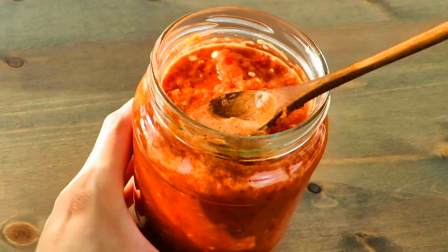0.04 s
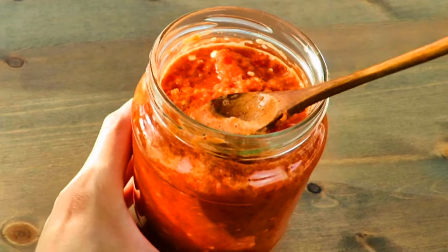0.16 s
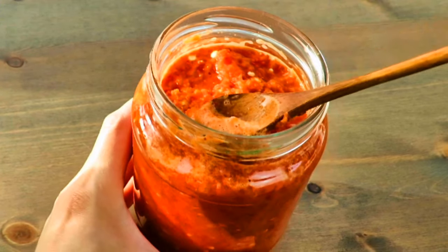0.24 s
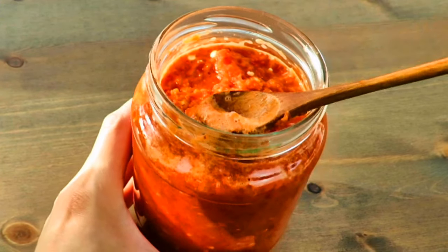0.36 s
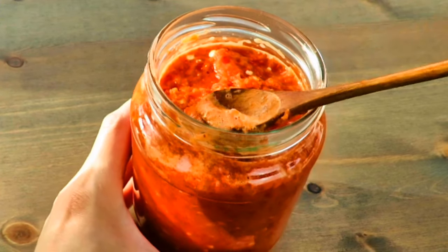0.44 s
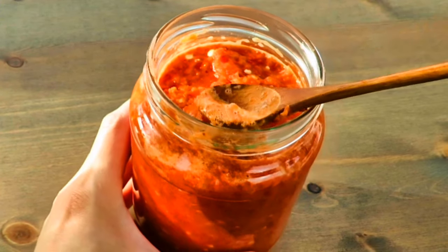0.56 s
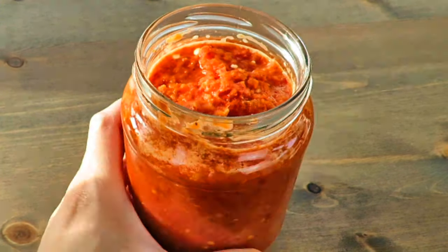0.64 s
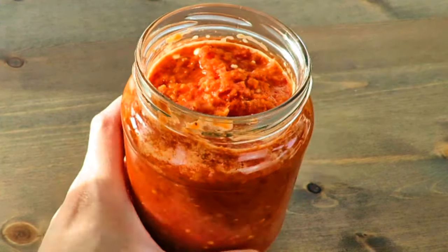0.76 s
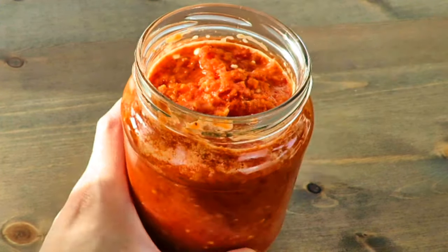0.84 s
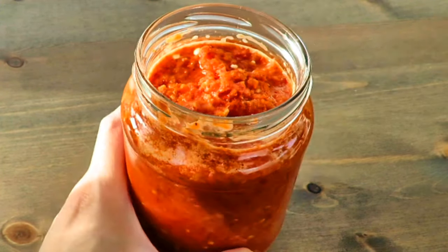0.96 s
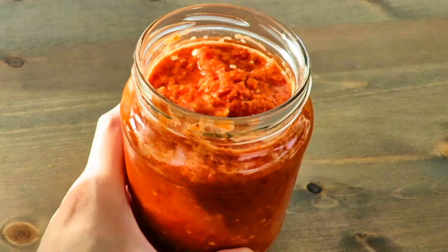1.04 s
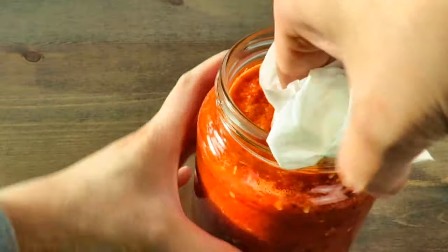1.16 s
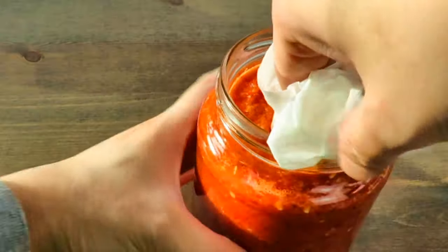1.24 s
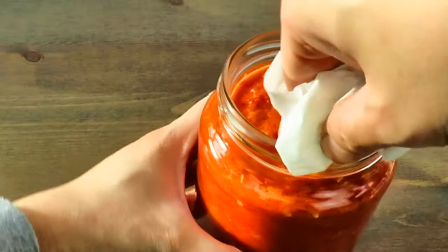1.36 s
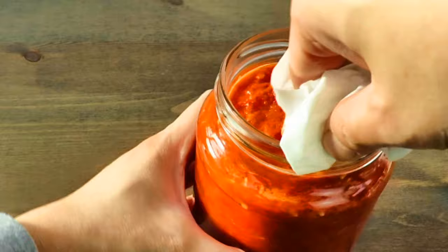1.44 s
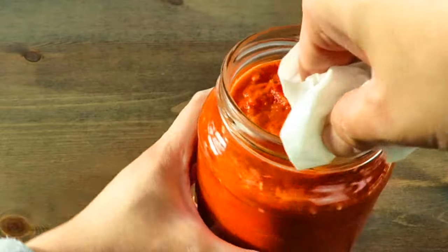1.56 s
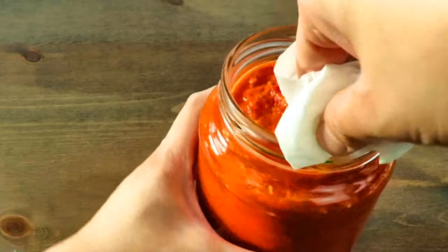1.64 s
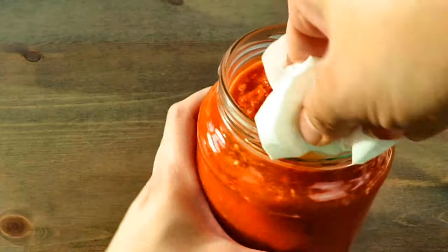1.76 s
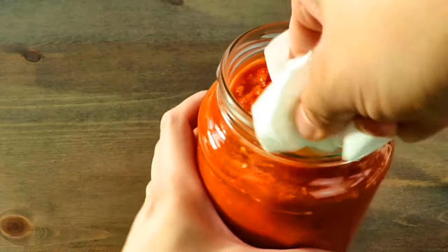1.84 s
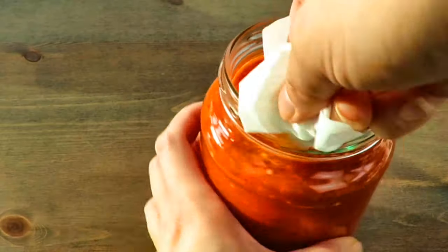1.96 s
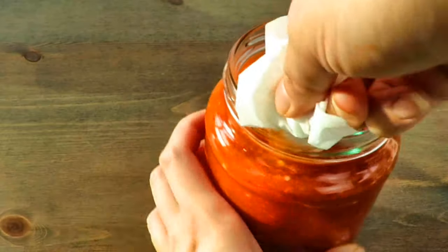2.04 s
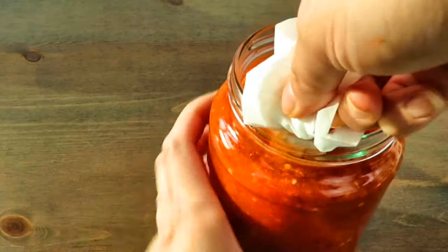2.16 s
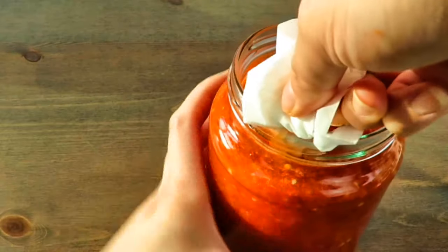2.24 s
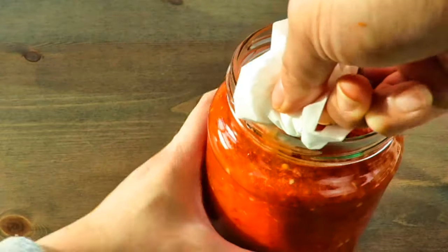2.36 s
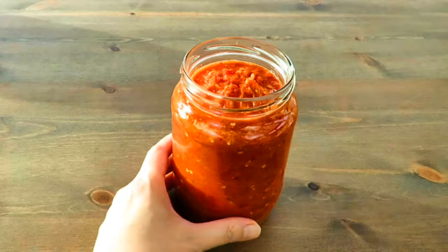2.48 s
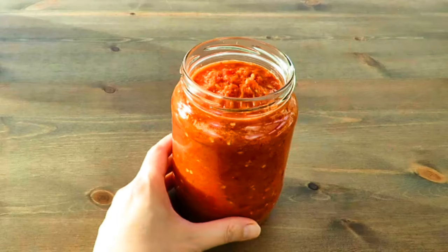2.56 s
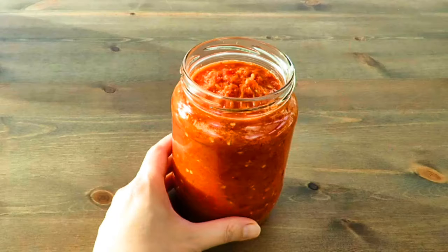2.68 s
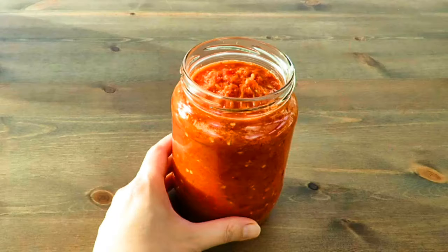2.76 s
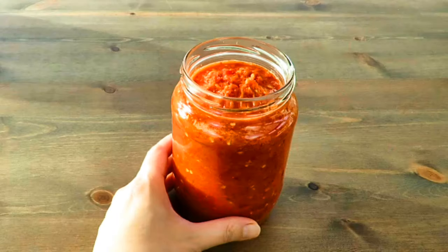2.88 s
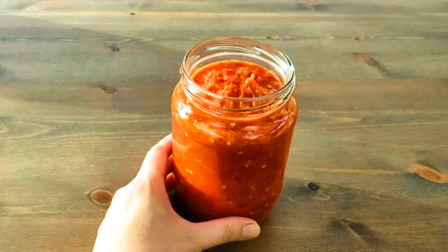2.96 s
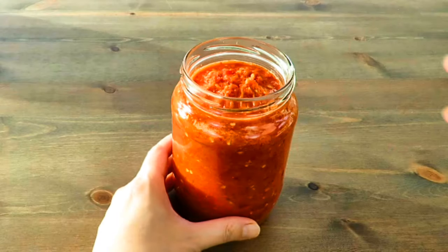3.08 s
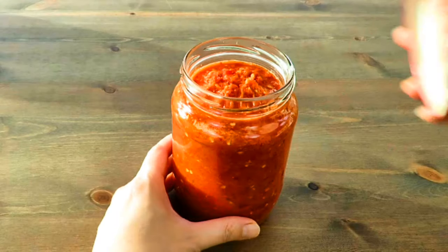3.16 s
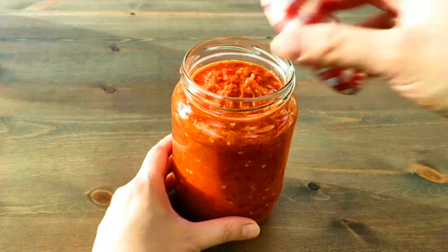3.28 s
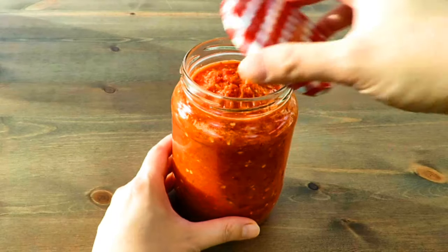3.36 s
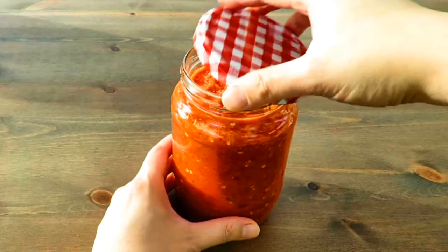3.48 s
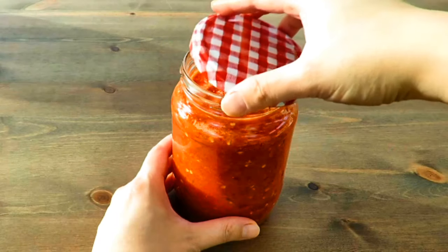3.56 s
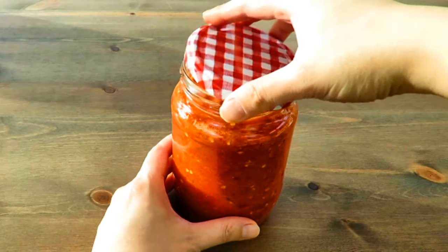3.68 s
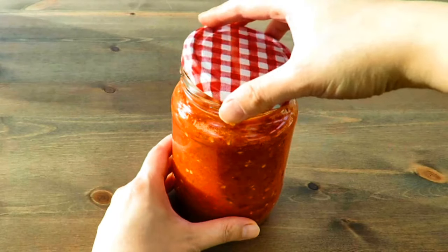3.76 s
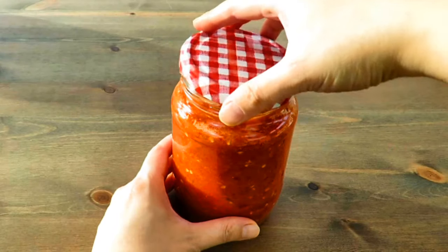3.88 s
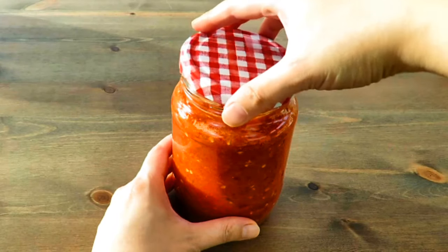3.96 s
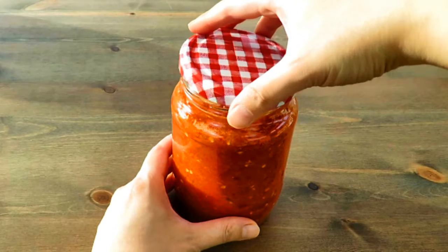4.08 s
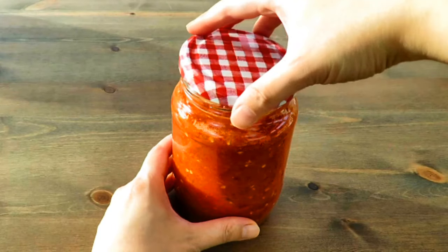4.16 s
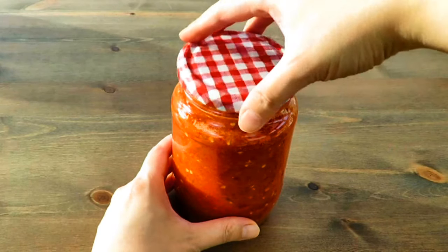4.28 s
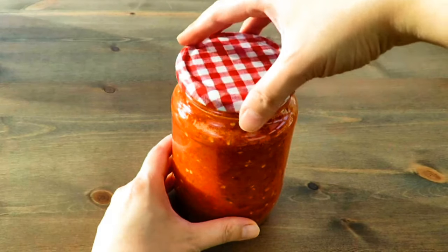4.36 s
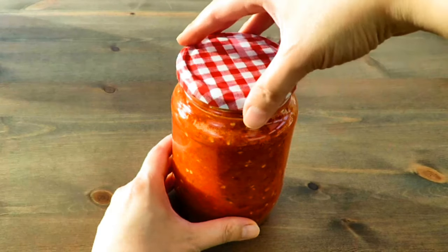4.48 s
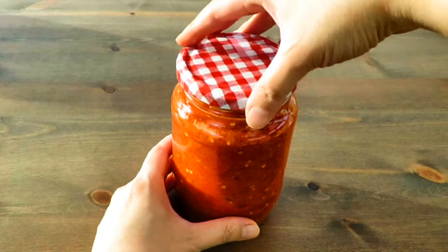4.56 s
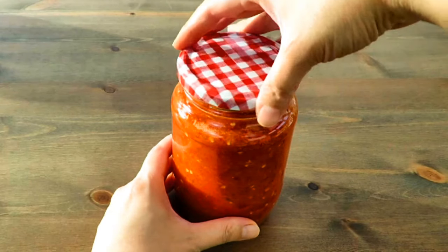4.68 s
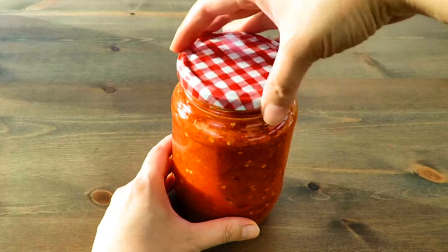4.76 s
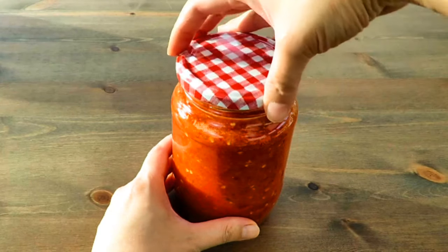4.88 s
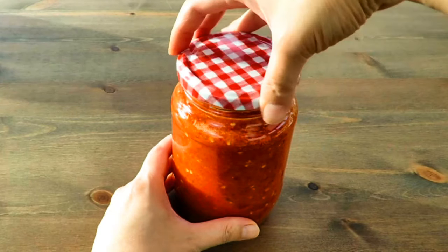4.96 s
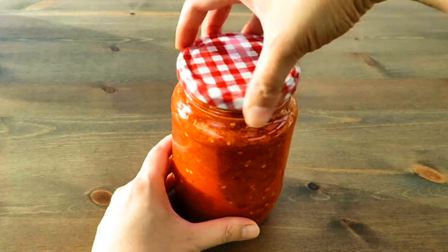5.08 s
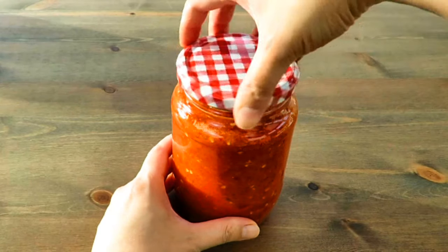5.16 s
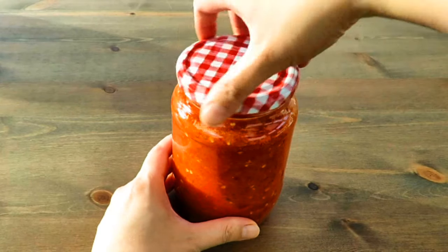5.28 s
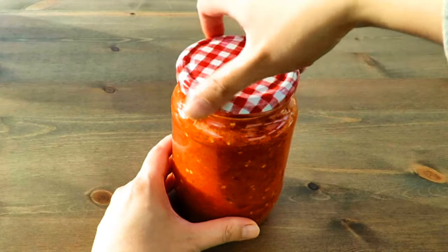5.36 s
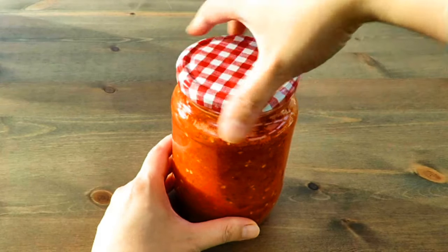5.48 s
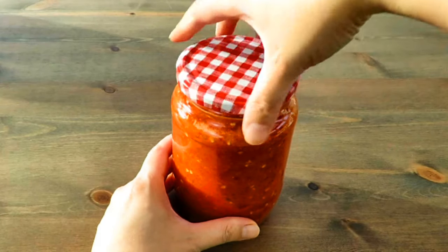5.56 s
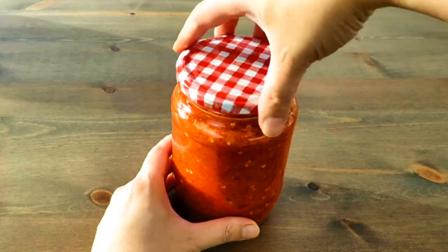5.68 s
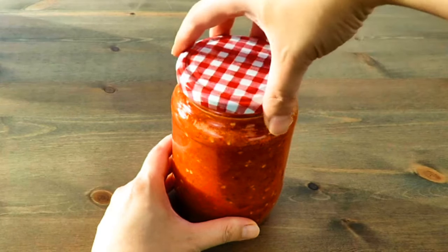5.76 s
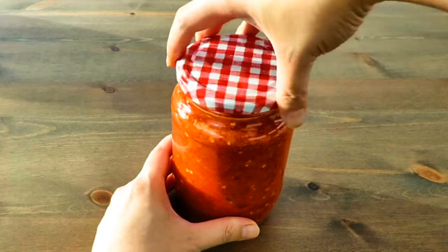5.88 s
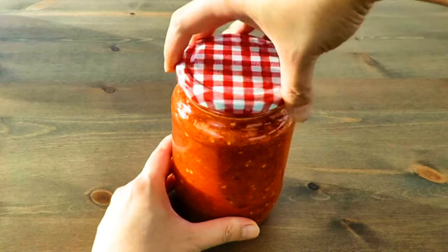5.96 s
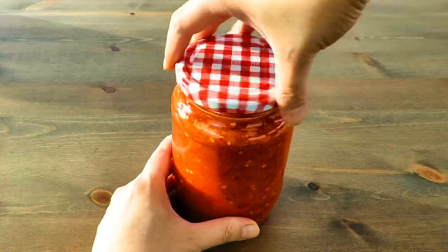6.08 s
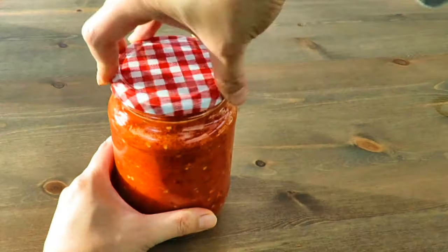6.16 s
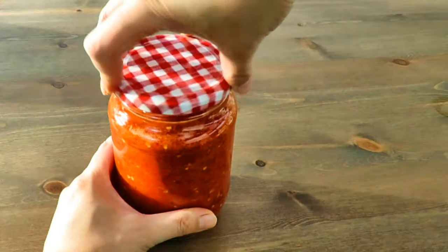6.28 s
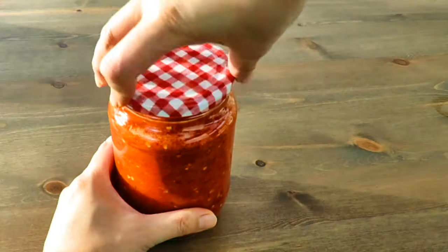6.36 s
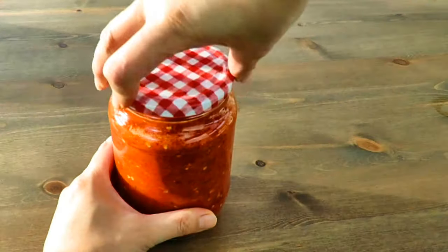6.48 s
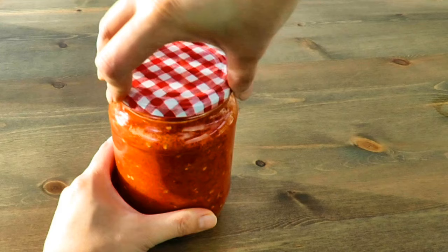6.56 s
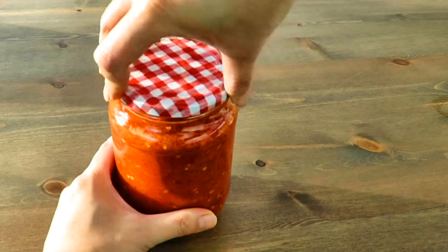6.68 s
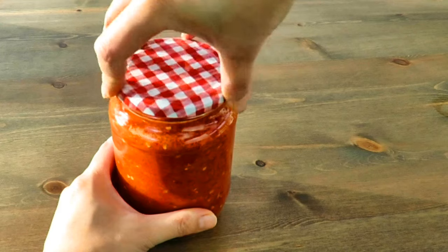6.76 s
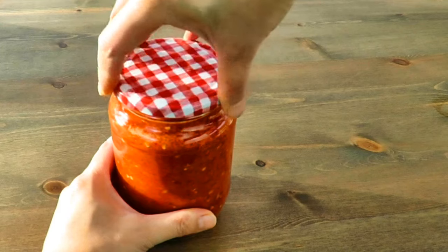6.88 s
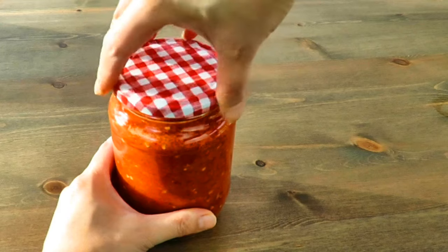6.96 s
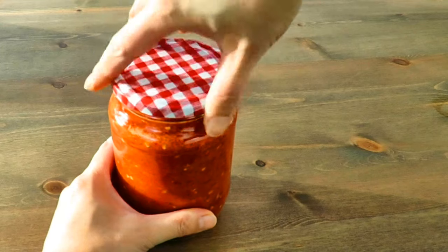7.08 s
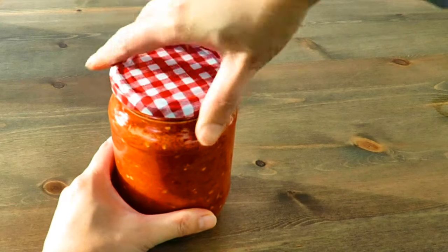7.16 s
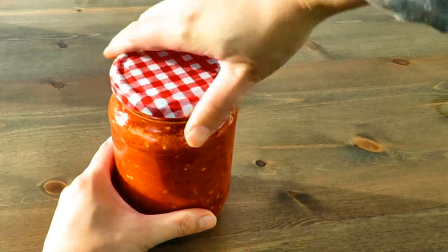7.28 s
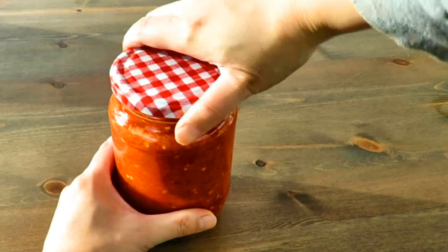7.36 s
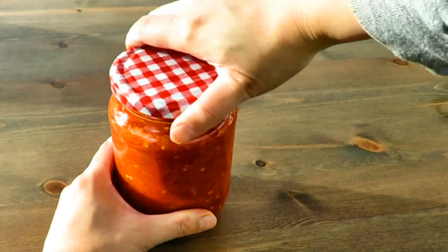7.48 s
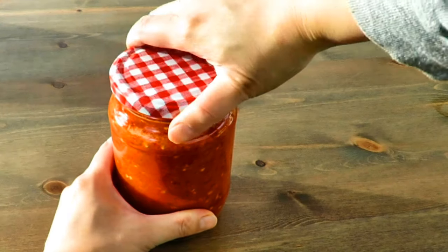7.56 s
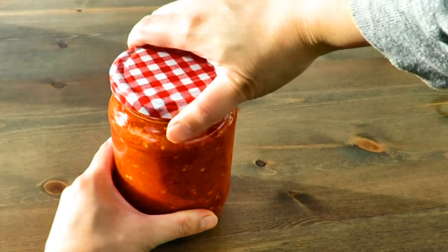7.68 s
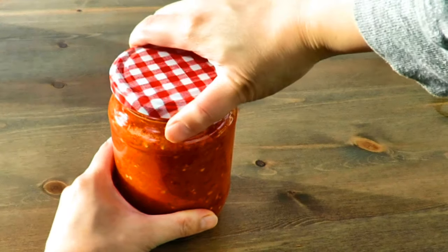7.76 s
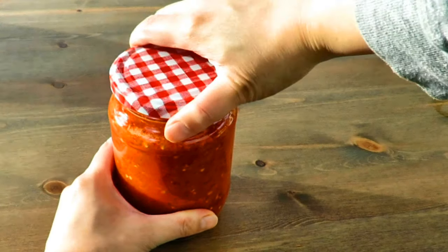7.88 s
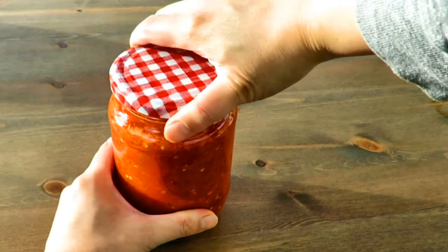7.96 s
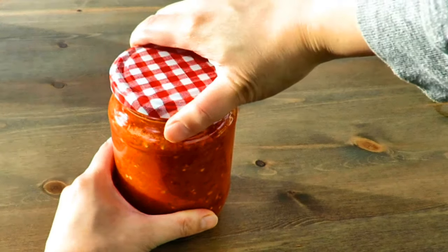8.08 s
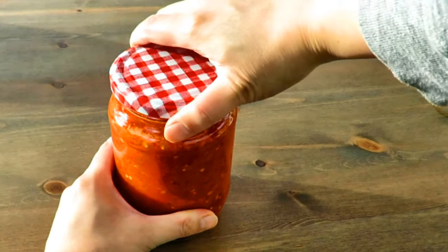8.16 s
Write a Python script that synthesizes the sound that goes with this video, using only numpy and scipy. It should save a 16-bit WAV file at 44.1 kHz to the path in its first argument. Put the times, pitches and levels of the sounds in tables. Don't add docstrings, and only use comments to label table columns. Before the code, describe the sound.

In a quiet home kitchen, a close stereo pair hears tiny wet ticks, then one wooden spoon knock on a full glass jar. Paper softly rubs the rim while the jar rocks and drags grittily over wood. After a pause, a thin metal lid clatters on, scrapes round in uneven catches and snaps hard. Low hand thumps follow through the table.

```python
import sys
import numpy as np
from scipy import signal
from scipy.fft import rfft, irfft
from scipy.io import wavfile
from scipy.ndimage import uniform_filter1d

SR = 44100
rng = np.random.default_rng(int(sys.argv[2]) if len(sys.argv) > 2 else 0)


def transcribe(u):
    v = np.clip(np.atleast_2d(u).T, -1, 1)
    q = np.round(v * 32767).astype(np.int16)
    wavfile.write(sys.argv[1], SR, q)


def gain_from_db(level_db):
    decades = np.asarray(level_db, float) / 20
    return 10 ** decades


N = 362369
BLOCK = 16384
STRIKE_LEN = 3000


def evened(x):
    return x / np.sqrt(np.mean(x ** 2) + 1e-20)


def read(points, hz):
    f, value = np.transpose(points)
    return np.interp(np.log(hz + 1), np.log(f + 1), value)


def add(mix, s, sound):
    part = mix[max(round(s * SR), 0):][:len(sound)]
    part += sound[:len(part)]


def played(rows):
    s, *columns = np.transpose(rows)
    t = np.arange(s[0], s[-1], 1 / SR)
    return s[0], [np.interp(t, s, c) for c in columns]


def chance(draw, size):
    return draw(size=-(-size // BLOCK) * BLOCK)


def coloured(points, size):
    white = chance(rng.standard_normal, size)
    gain = gain_from_db(read(points, np.fft.rfftfreq(len(white), 1 / SR)))
    return evened(irfft(rfft(white) * gain)[:size])


def grit(size, per_s, spread_db):
    when = chance(rng.random, size)
    sign = chance(rng.random, size)
    heavy = chance(rng.standard_exponential, size)
    slips = (when < per_s / SR) * np.sign(sign - .5) * gain_from_db(spread_db * np.minimum(heavy, 4))
    return slips[:size]


def resonate(x, hz, width):
    turn = np.exp(2j * np.pi * np.cumsum(hz * np.ones(len(x))) / SR)
    r = np.exp(-np.pi * width / SR)
    return 2 * (turn * signal.lfilter([1 - r], [1, -r], x / turn + 1e-18)).real


def body(x, modes):
    total = 0
    for hz, width, db in modes:
        pole = np.exp((2j * hz - width) * np.pi / SR)
        total = total + gain_from_db(db) * evened(signal.lfilter([1], [1, -pole], x).imag)
    return evened(total)


def struck(modes, rise, wander_db=0., detune=0.):
    t = np.arange(STRIKE_LEN)[:, None] / SR
    hz, width, db = np.transpose(modes)
    phase = rng.random(len(hz))
    wander, shift = rng.standard_normal((2, len(hz)))
    ring = gain_from_db(db + wander_db * wander) * np.exp(-np.pi * width * np.maximum(t - rise, 0))
    tones = ring * np.sin(2 * np.pi * (hz * (1 + detune * shift) * t + phase))
    x = tones.sum(1) * np.sin(np.pi / 2 * np.minimum(t[:, 0] / rise, 1)) ** 2
    return x / abs(x).max()


# frequency in Hz, level in dB per Hz.
AIR_MID = [(28, -10), (60, -20), (85, -6), (140, 0), (200, -5), (300, -10), (450, -12), (580, -14),
           (700, -10), (950, -18), (1300, -20.5), (4700, -30), (7000, -36.5), (11000, -41), (14300, -49),
           (15200, -85)]
# frequency in Hz, level in dB per Hz.
AIR_SIDE = [(15, -67), (25, -37), (125, -11), (182, -3), (418, -1), (642, -9), (909, -10), (1510, -17),
            (10700, -39), (14000, -42), (15200, -85)]
# time in seconds, level in dB.
AIR_LEVEL = [(0, -53), (3.6, -53.5), (4.4, -55.5), (6.45, -55), (6.8, -59), (7.1, -57), (7.5, -55),
             (8.22, -56)]


def air():
    mid = coloured(AIR_MID, N)
    side = gain_from_db(-1) * coloured(AIR_SIDE, N)
    level = gain_from_db(np.interp(np.arange(N) / SR, *np.transpose(AIR_LEVEL)))
    return level * np.array([mid + side, mid - side])


# start and end in seconds, middle mode in dB, deep mode in dB against it.
GRIPS = [
    (0, .67, -46.5, -19),
    (.68, 2.44, -50, -3),
    (5.5, 6.35, -60, -3),
    (6.9, 7.4, -62, -3),
]
# peak in seconds, deep mode in dB, middle mode in dB against it.
PRESSES = [
    (1.03, -44, -4),
    (3.59, -62, 8),
    (4.7, -58, -6),
]
# start in seconds, level in dB.
JOLTS = [
    (.68, -40),
    (5.36, -39),
    (5.945, -39),
]
# start in seconds, peak in dB.
THUMPS = [
    (3.655, -45),
    (3.96, -37.5),
    (5.095, -38),
    (7.425, -41),
    (7.7, -36),
    (8.035, -36),
]
# time in seconds, level in dB.
DRAG = [(1.15, -58), (1.36, -56), (1.378, -43), (1.432, -41.5), (1.79, -41), (1.83, -45), (1.9, -39),
        (1.98, -38), (2.035, -32), (2.09, -33), (2.22, -51), (2.44, -61)]


def shaking():
    power = np.zeros((N, 3))
    foot_db, upper_db = -19, -6
    for start, end, db, deep_db in GRIPS:
        steady = np.ones((round((end - start) * SR), 1))
        add(power, start, steady * gain_from_db(db + np.array([deep_db, 0, upper_db / 2])) ** 2)
    for s, db, middle_db in PRESSES:
        start, (arch_db,) = played([(s - .125, foot_db), (s, 0), (s + .2, foot_db)])
        add(power, start, gain_from_db(db + arch_db[:, None] + [0, middle_db, middle_db + upper_db]) ** 2)
    for s, db in THUMPS:
        start, (arch_db,) = played([(s - .05, foot_db), (s + .07, 0), (s + .3, foot_db)])
        add(power, start, gain_from_db(db + arch_db[:, None] + (-11, -13, -11)) ** 2)
    fade_db = 105 * np.arange(SR // 2)[:, None] / SR
    for s, db in JOLTS:
        add(power, s, gain_from_db(db - fade_db + (-11, -8, -.1)) ** 2)
    s, (db,) = played(DRAG)
    add(power, s, gain_from_db(db[:, None] + (-12, -11, -7)) ** 2)
    return np.sqrt(power.T)


# frequency in Hz, width in Hz.
TABLE_MODES = [(95, 26), (162, 42), (290, 200)]
# frequency in Hz, width in Hz, level in dB.
WOOD_LOW = [(330, 50, -4), (420, 60, 0), (480, 50, 0), (575, 60, -2), (670, 50, -5), (760, 80, -8)]
# frequency in Hz, width in Hz, level in dB.
WOOD_HIGH = [(810, 60, -6), (925, 28, 0), (1010, 30, 0), (1280, 120, -9), (1720, 150, -12)]


def table():
    out = np.zeros(N)
    for level, (hz, width) in zip(shaking(), TABLE_MODES):
        rumble = body(rng.standard_normal(N), [(hz, width, 0)])
        add(out, 0, level * body(rumble, [(hz, 2 * width, 0)]))
    s, (db,) = played(DRAG)
    slips = uniform_filter1d(grit(len(db), 1500, 2.1), size=8)
    add(out, s, gain_from_db(db + 1.2) * (body(slips, WOOD_LOW) + gain_from_db(-6.5) * body(slips, WOOD_HIGH)))
    return out


# start in seconds, peak in dB,
# frequency in Hz, width in Hz.
TICKS = [(.034, -39, 2300, 500), (.038, -43, 2600, 500), (.324, -44, 2400, 800), (1.1153, -35, 4000, 7000),
         (1.1153, -40, 12000, 7000), (1.3143, -46, 9000, 5000), (2.417, -46, 2300, 1500),
         (2.43, -46, 4300, 900), (2.438, -43, 3400, 900), (2.425, -40, 330, 60), (2.44, -36, 250, 90),
         (2.52, -45, 3000, 6000), (3.797, -46, 9000, 6000), (3.797, -42, 3500, 3000),
         (4.301, -40, 9000, 7000), (5.035, -49, 4500, 400), (5.292, -44, 3400, 90),
         (7.686, -44, 5000, 2000), (7.727, -42, 4900, 700), (7.738, -48, 4000, 900), (7.77, -43, 4800, 700),
         (7.492, -37, 8000, 9000)]


def ticks():
    out = np.zeros(N)
    for s, db, hz, width in TICKS:
        add(out, s, gain_from_db(db) * struck([(hz, width, 0)], .0004))
    return out


# frequency in Hz, width in Hz, level in dB.
SPOON_MODES = [(199, 22, -1.5), (415, 43, -3), (1180, 52, -.5), (2170, 38, -1.5), (2310, 52, -3),
               (2720, 62, -1), (3960, 35, -11), (4320, 51, -15), (4500, 27, -15), (4960, 49, -20),
               (6400, 100, -30)]
# frequency in Hz, level in dB per Hz.
SPOON_WASH = [(120, -35), (200, -5), (422, -9), (665, -24), (1050, -10), (1590, -20), (2800, -11),
              (9000, -63), (15500, -79)]


def spoon():
    start, click_db, ring_db, t60 = .6765, -14, -28.5, .4
    t = np.arange(SR // 2) / SR
    wide = [(hz, 1.8 * width, db) for hz, width, db in SPOON_MODES]
    slips = uniform_filter1d(grit(len(t), 2500, 2.), size=5)
    ring = body(slips, wide) + .55 * coloured(SPOON_WASH, len(t))
    sound = gain_from_db(ring_db - 60 * t / t60) * ring * (1 + .9 * np.exp(-t / .008))
    sound[:3] += gain_from_db(click_db) * np.array([.5, 1, .5])
    out = np.zeros(N)
    add(out, start, sound)
    return out


# start in seconds, peak in dB, frequency in Hz.
BOOMS = [
    (.83, -40, 205),
    (.869, -39, 151),
    (.982, -40, 156),
    (1.225, -33, 160),
    (1.299, -33, 145),
    (1.335, -36, 156),
    (2.175, -30, 150),
    (2.24, -32, 148),
    (2.407, -40, 153),
]


def rocking():
    out = np.zeros(N)
    for s, db, hz in BOOMS:
        add(out, s, gain_from_db(db) * struck([(hz, 15, 0)], .02))
    return out


# frequency in Hz, level in dB.
RUB = [(400, -30), (800, -1), (1600, 0), (2700, -3), (4000, -11), (6000, -22), (8000, -45)]
# frequency in Hz, level in dB.
PAPER = [(3000, -30), (5500, -3), (7300, 0), (9000, -4), (12000, -3), (13800, -8), (15000, -22),
         (16000, -55)]
# start, peak and end
# in seconds, level in dB, fibre hiss in dB against it.
STROKES = [(1.11, 1.14, 1.2, -56, -7), (1.12, 1.75, 2.44, -54, -20), (1.29, 1.34, 1.42, -62, -4),
           (1.72, 1.75, 1.79, -62, -3), (1.89, 1.92, 1.97, -65, -4), (2.0, 2.04, 2.12, -64, -5),
           (5.57, 5.9, 5.94, -63, -17), (5.25, 5.32, 5.33, -52, -26), (5.328, 5.35, 5.47, -44, -24),
           (5.944, 5.96, 6.06, -42, -22), (4.38, 4.41, 4.5, -51, -28), (7.49, 7.495, 7.62, -52, -9),
           (7.6, 7.74, 8.2, -63, -8)]


def rubbing():
    out = np.zeros(N)
    for start, peak, end, top_db, hiss_db in STROKES:
        s, (db,) = played([(start, top_db - 5), (peak, top_db), (end, top_db - 15)])
        size = len(db)
        wander = uniform_filter1d(chance(rng.standard_normal, size), size=300)
        clumps = gain_from_db(1.5 * evened(wander[:size]))
        add(out, s, gain_from_db(db) * clumps * (coloured(RUB, size) + gain_from_db(hiss_db) * coloured(PAPER, size)))
    return out


# frequency in Hz, delay in seconds, swell in seconds, level in dB.
THUMP_MODES = [(91.5, 0, .036, .5), (129, .035, .04, -1), (232, .02, .05, -14)]


def thumps():
    out = np.zeros(N)
    t = np.arange(SR // 2) / SR
    for s, db in THUMPS:
        for hz, delay, swell, mode_db in THUMP_MODES:
            wobble, phase = rng.standard_normal(2)
            level = gain_from_db(db + mode_db) * t / swell * np.exp(1 - t / swell)
            add(out, s + delay, level * np.sin(2 * np.pi * hz * (1 + .015 * wobble) * t + phase))
    return out


# start in seconds, peak in dB, frequency in Hz, width in Hz.
RINGS = [(3.795, -27, 1510, 28), (3.796, -30, 1555, 28), (3.797, -42, 2810, 60), (3.797, -49, 3400, 12),
         (3.797, -52, 5520, 50), (3.797, -52, 4300, 60), (3.868, -38, 2620, 22), (3.868, -39, 4750, 120),
         (3.868, -41, 6900, 70), (3.916, -42, 2050, 25), (3.916, -33, 2960, 40), (3.916, -36, 3400, 35),
         (3.916, -27, 1510, 40), (4.318, -32, 570, 25), (4.301, -41, 3380, 40), (4.317, -34, 2940, 40),
         (4.317, -44, 6450, 60), (5.189, -35, 1310, 150), (5.232, -44, 2950, 50), (5.329, -37, 3400, 30),
         (5.33, -30, 880, 60), (5.349, -40, 4900, 200), (5.392, -29, 800, 150), (6.418, -22, 2190, 45),
         (6.43, -25, 905, 14), (6.44, -26, 480, 14), (6.301, -34, 1330, 120), (6.42, -30, 3430, 18),
         (6.42, -24, 1505, 15), (6.562, -30, 1950, 200), (7.492, -42, 1510, 35), (7.492, -43, 2090, 40),
         (7.493, -43, 3550, 150), (7.493, -52, 8500, 1500)]


def rings():
    out = np.zeros(N)
    for s, db, hz, width in RINGS:
        add(out, s, gain_from_db(db) * struck([(hz, width, 0)], min(.19 / width, .006)))
    return out


# frequency in Hz, width in Hz, level in dB.
JAR = [(355, 90, -5), (410, 45, 0), (480, 40, 0), (560, 50, 1), (670, 60, -7), (905, 45, -8)]
# start in seconds, peak in dB.
BUMPS = [(3.797, -41), (3.916, -36), (4.111, -42), (4.301, -38), (4.44, -38), (4.49, -41), (4.86, -42),
         (5.749, -42), (6.142, -36), (4.316, -41), (4.383, -34), (4.758, -35), (4.94, -39), (5.2, -31),
         (5.328, -34), (5.346, -22), (5.365, -33), (5.404, -24), (5.946, -30), (5.964, -21), (6.003, -32),
         (6.174, -36), (6.31, -32), (6.562, -31)]


def bumps():
    out = np.zeros(N)
    for s, db in BUMPS:
        add(out, s, gain_from_db(db) * struck(JAR, .002, 3., .025))
    return out


# frequency in Hz, width in Hz, level in dB.
DOME = [(940, 70, -21), (1080, 130, -8), (1355, 90, -9), (1515, 35, -14)]
# frequency in Hz, width in Hz, level in dB.
RIM = [(2070, 60, -3), (2200, 70, -5), (2580, 90, -4), (2930, 55, 1), (3400, 45, -2)]
# frequency in Hz, width in Hz, level in dB.
EDGE = [(4200, 60, -2), (4700, 60, 0), (5370, 90, -2), (6500, 90, -2), (7000, 100, -4), (8450, 150, -6),
        (10800, 400, -5), (12800, 600, 1.5)]
# frequency in Hz, level in dB.
SCRAPE = [(500, -20), (1500, 0), (3000, -4), (5000, -9), (8000, -15), (10000, -22), (12800, -13),
          (16000, -35)]
# start in seconds, peak in dB, dome in Hz, hardness (rim and edge in dB over the usual).
LANDING = [(3.868, -25, 1170, 9), (3.915, -14, 1520, .5), (4.037, -41, 1380, .1), (4.056, -41, 1420, .1),
           (4.111, -33, 1520, 3), (4.232, -46, 1140, .1), (4.265, -44, 1570, .1), (4.301, -21, 1480, 1),
           (4.317, -9.5, 1320, -3.5), (4.326, -19, 1330, -1.5), (4.338, -20, 1390, .5),
           (4.384, -17, 1360, -1.5), (4.395, -22, 1350, -.5), (4.407, -23, 1170, .1),
           (4.429, -27, 1380, -2.5), (4.476, -32, 1500, -4), (4.526, -34, 1500, 1.5),
           (4.539, -34, 1350, -1.5)]
# start in seconds, peak in dB, dome in Hz, hardness in dB.
TURNING = [(4.674, -36, 1390, 6), (4.759, -32, 1070, -4), (4.784, -41, 1180, -3), (4.821, -38, 1180, -3),
           (4.86, -44, 1150, -3), (4.94, -29, 1360, -3), (5.025, -46, 1240, 3), (5.046, -37, 1070, -1.5),
           (5.069, -36, 1260, .1), (5.089, -37, 1410, .1), (5.129, -40, 1360, .1), (5.173, -33, 1290, -2.5),
           (5.202, -18, 1310, -9), (5.3285, -19, 1400, 5), (5.348, -24, 950, 10), (5.365, -26, 1300, 1.5),
           (5.391, -29, 1100, .1), (5.406, -29, 950, 5.5), (5.749, -40, 1520, 5), (5.947, -21, 945, 3),
           (5.9635, -22, 1410, 13), (6.002, -26, 1210, 2.5), (6.024, -26, 1380, .1), (6.14, -22, 1280, 2),
           (6.162, -29, 1140, -3), (6.175, -21, 1190, -7.5), (6.222, -30, 1200, 1.5), (6.257, -37, 980, .1),
           (6.269, -34, 1290, 4), (6.311, -17, 1050, -8), (6.382, -32, 1310, -3), (6.4, -28, 1340, -3),
           (6.507, -25, 1430, .1), (6.563, -21, 1360, 3), (6.686, -40, 1400, .1)]


def touches():
    out = np.zeros(N)
    t = np.arange(STRIKE_LEN) / SR
    for s, db, hz, hard_db in LANDING + TURNING:
        dome = struck([(hz, 210, 0)] + DOME, .0023, 2., .03)
        damping = 1 if s < TURNING[0][0] else 1.8
        rim = struck([(f, damping * w, level) for f, w, level in RIM], .001, 4., .015)
        edge = struck(EDGE, .0004, 4., .03) + .5 * coloured(SCRAPE, len(t)) * np.exp(-t / .003)
        metal = gain_from_db(hard_db) * (gain_from_db(-17) * rim + gain_from_db(-24) * edge)
        add(out, s - .001, gain_from_db(db + .3) * (dome + metal))
    return out


# time in seconds, frequency in Hz.
BEND = [
    [(3.87, 1150), (3.91, 1150), (3.925, 1480), (4.12, 1400), (4.24, 1150), (4.32, 1250), (4.42, 1300),
     (4.55, 1420)],
    [(4.67, 1420), (4.74, 1400), (4.77, 1120), (4.84, 1210), (4.95, 1330), (5.065, 1190), (5.11, 1400),
     (5.3, 1300), (5.52, 1060)],
    [(5.95, 1330), (6.12, 1230), (6.18, 1190), (6.32, 1080), (6.36, 1200), (6.41, 1250), (6.44, 1320),
     (6.54, 1480), (6.8, 1480)],
]
# start in seconds, level in dB,
# fade in dB per second (swells if negative), rim in dB against it.
SLIPS = [(3.875, -39, 240, -9), (3.925, -36, 135, -11), (4.115, -50, 200, -12), (4.22, -60, -20, -14),
         (4.33, -31, 90, -16), (4.68, -51, 120, -14), (4.775, -46, 75, -23), (4.945, -45, 250, -18),
         (5.0, -58, -200, -17), (5.075, -41.5, 130, -15), (5.165, -45, -250, -21), (5.21, -42, 20, -13),
         (5.335, -31, 120, -11), (5.935, -48, -300, -12), (5.965, -35, 60, -7), (5.995, -32, 200, -14),
         (6.145, -39, -170, -18), (6.185, -38, 250, -18), (6.228, -47, 10, -14), (6.29, -37, 100, -15),
         (6.345, -40, -90, -19), (6.42, -33, 100, -7)]


def slipping():
    out = np.zeros(N)
    attack_s, depth_db = .01, 38
    for s, db, fade_db, rim_db in SLIPS:
        ends = [row[0] - s + attack_s for row in SLIPS if row[0] > s]
        t = np.arange(0, min([depth_db / abs(fade_db)] + ends), 1 / SR)
        wander = evened(uniform_filter1d(chance(rng.standard_normal, len(t)), size=900))[:len(t)]
        hz = np.interp(s + t, *np.concatenate(BEND).T) * (1 + .06 * wander)
        jar_db = -9 if s < TURNING[0][0] else -2.5
        slips = uniform_filter1d(grit(len(t), 1800, 2.2), size=3)
        glide = evened(resonate(resonate(slips, hz, 110), hz, 260))
        dome = evened(glide + .3 * body(slips, DOME))
        rim = evened(body(slips, RIM) + .2 * body(slips, EDGE) + .35 * coloured(SCRAPE, len(t)))
        bites_db = 3.5 * wander[::-1]
        ends_gain = np.minimum(np.minimum(t, t[::-1]) / attack_s, 1)
        level = gain_from_db(db - 2.6 - fade_db * t + bites_db) * ends_gain
        add(out, s, level * (dome + gain_from_db(jar_db) * body(slips, JAR) + gain_from_db(rim_db) * rim))
    return out


# frequency in Hz, width in Hz, depth from 0 to 1.
VALLEYS = [(750, 160, .55), (1720, 200, .55)]


def lid():
    out = touches() + bumps() + rings() + slipping()
    for hz, width, depth in VALLEYS:
        out = out - depth * resonate(out, hz, width)
    return out


# frequency in Hz, width in Hz, level in dB.
SNAP_MODES = [(2200, 50, 3), (2570, 35, -1), (2940, 35, 1), (3430, 30, -1), (4690, 35, 0), (5500, 60, .5),
              (6570, 55, -9), (7200, 51, -7), (12600, 15, -19)]


def snap():
    start, db, length, thump_db = 6.4152, -1.3, .008, -19
    t = np.arange(STRIKE_LEN) / SR
    swell = struck([(1370, 180, 0), (1520, 30, -18)], .5 * length)
    jar_modes = [(960, 120, 0), (910, 22, -7), (422, 28, -5.5), (480, 30, -7), (560, 60, -11), (330, 60, -10)]
    late = np.roll(struck(jar_modes, .3 * length), int(.35 * length * SR))
    late = late - .7 * resonate(late, 730, 200)
    contact = (t / length) ** 2 * np.exp(-(1.2 * t / length) ** 3)
    wide = [(hz, 5.5 * width, level) for hz, width, level in SNAP_MODES]
    crack = body(rng.standard_normal(len(t)) * contact, wide)
    crack = crack + .9 * evened(coloured(SCRAPE, len(t)) * contact)
    thump = np.sin(2 * np.pi * 90 * t) * np.exp(-t / .008)
    metal = 1.1 * swell + .9 * late + .5 * crack / abs(crack).max()
    out = np.zeros(N)
    add(out, start, gain_from_db(db) * metal + gain_from_db(thump_db) * thump)
    return out


# frequency in Hz, time to fall 60 dB in seconds.
KITCHEN = [(150, .5), (500, .5), (1400, .5), (4000, .42), (8000, .35), (14000, .3)]


def kitchen(x):
    taps = np.zeros((2, SR // 2))
    at = np.arange(0, SR // 2 - 20, 20)
    at = at + rng.integers(0, 20, (2, len(at)))
    np.put_along_axis(taps, at, rng.choice([-1., 1.], at.shape), 1)
    taps[:, :250] = 0
    hz, t, z = signal.stft(taps + .5 * taps[::-1], SR, nperseg=256)
    z *= gain_from_db(-60 * t / read(KITCHEN, hz)[:, None])
    tail = signal.istft(z, SR, nperseg=256)[1]
    return signal.fftconvolve(x[None], tail / np.linalg.norm(tail[0]), axes=1)[:, :N]


def scene():
    bass_cut = signal.butter(2, 75, "high", fs=SR)
    close = signal.lfilter(*bass_cut, lid() + snap() + ticks())
    rub = rubbing()
    spread = gain_from_db(-7) * rubbing()
    low = signal.lfilter(*bass_cut, table() + thumps() + rocking() + spoon())
    lead = np.gradient(close + low)
    bounce = np.roll(np.gradient(lead), 37)
    side = gain_from_db(-11) * lead + gain_from_db(-5) * bounce + spread
    echoing = gain_from_db(-11) * (close - uniform_filter1d(close, size=200)) + gain_from_db(-13) * low
    return close + low + rub + np.array([1, -1])[:, None] * side + kitchen(echoing) + air()


def roll_off(x):
    return signal.sosfilt(signal.butter(12, 16610, fs=SR, output="sos"), x)


def record(dry):
    lowpass = signal.firwin(255, 16300, window=("kaiser", 9), fs=SR)
    mix = signal.oaconvolve(np.clip(dry, -1, 1), lowpass[None], "same")
    return roll_off(mix)


dry = scene()
out = record(dry)
transcribe(out)
```